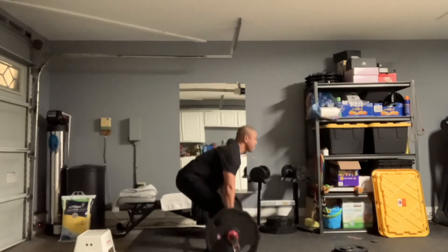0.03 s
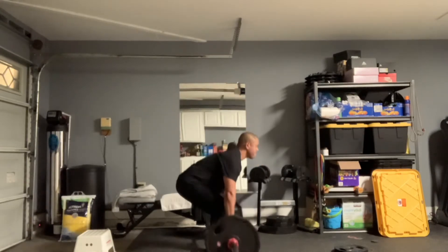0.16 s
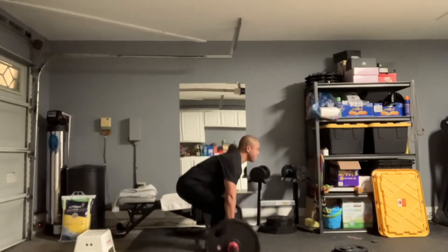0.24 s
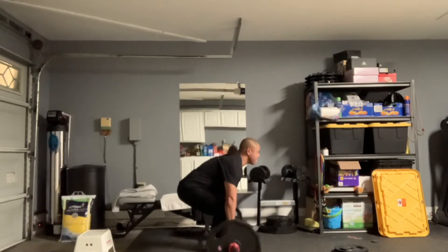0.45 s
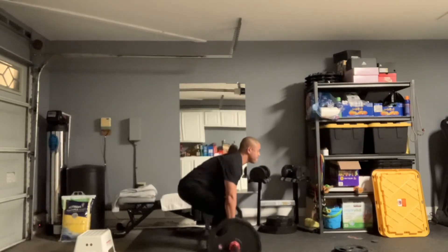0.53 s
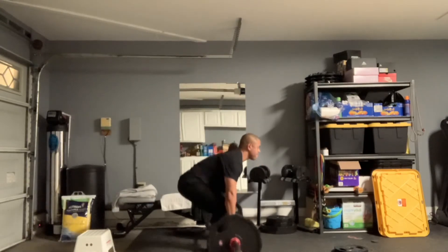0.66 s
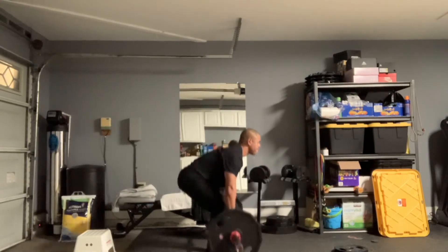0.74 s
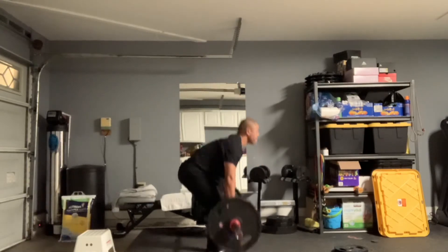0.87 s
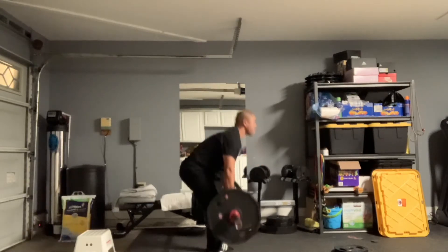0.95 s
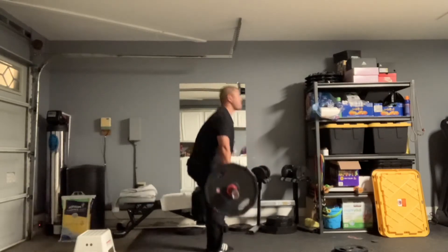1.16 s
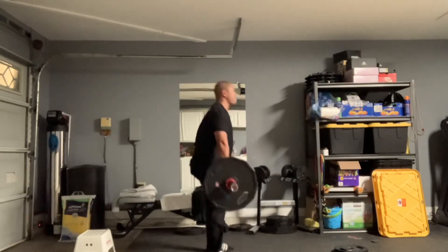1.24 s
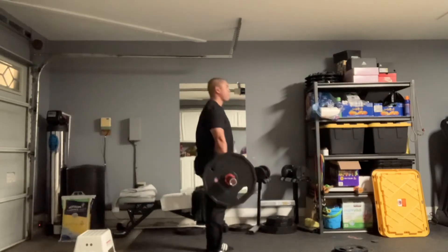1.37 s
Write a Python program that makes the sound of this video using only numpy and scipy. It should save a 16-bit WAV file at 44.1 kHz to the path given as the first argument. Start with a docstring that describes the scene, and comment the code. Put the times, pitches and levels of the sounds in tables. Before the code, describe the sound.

A loaded barbell hits a garage floor: dull bumps at 0.2 seconds, then a loud double clash of plates at 0.23-0.25, with zinging, chattering rebounds fading by 0.5. Steel ringing and room reverberation decay over the following second. Faint soft bumps come near 0.65-0.7, and a small metallic clunk at 1.13 as the bar lifts. Low rumble, mains hum and a faint pulsing cricket-like trill continue throughout.

```python
"""A bare garage, heard from where the reverberation outweighs the direct sound, on two channels.
A loaded barbell lands on the floor: filtered noise bursts make the plates clash and the sleeves zing,
decaying pairs of sines ring the steel bar, and trains of small contacts chatter as it rebounds.
Soft bumps surround the landing; later the bar clunks softly against the plates as it is lifted.
Shaped noise and steady sines give the low rumble and hum, swelling narrow noise a faint high trill."""
import sys
import numpy as np
from scipy import signal
from scipy.fft import rfft, irfft
from scipy.io import wavfile
from scipy.ndimage import uniform_filter1d

SR = 44100
rng = np.random.default_rng(int(sys.argv[2]) if len(sys.argv) > 2 else 0)


def pcm_store(signal):
    """Save signal as 16-bit PCM."""
    levels = np.round(np.clip(np.atleast_2d(signal), -1, 1) * 32767)
    wavfile.write(sys.argv[1], SR, levels.astype(np.int16).T)


N = 61739
T = np.arange(N) / SR  # s
SIZE = 2 ** 16  # samples in a long spectrum
FREQ = np.maximum(np.arange(SIZE // 2 + 1) * SR / SIZE, 1)  # Hz
SHORT = 2 ** 13  # samples in one contact sound
SHORT_T = np.arange(SHORT) / SR  # s
SHORT_HZ = np.maximum(np.arange(SHORT // 2 + 1) * SR / SHORT, 1)


def undb(db):
    """Decibels to gain."""
    return 10 ** (np.asarray(db) / 20)


def curve(points, hz=FREQ):
    """Read (Hz, value) points on a log-frequency axis."""
    f, v = np.array(points, float).T
    return np.interp(np.log(hz), np.log(f), v)


def unit(x):
    """Scale each channel to unit energy."""
    return x / np.sqrt(np.sum(x ** 2, axis=-1, keepdims=True))


def unit_rms(x):
    """Scale each N-sample channel to an RMS of one."""
    return unit(x) * np.sqrt(N)


def fade(t60, t=T):
    """Exponential decay, falling 60 dB in t60 seconds."""
    return np.exp(-np.log(1000) * t / max(t60, 1e-4))


def add(out, x, s):
    """Mix a sound in at its moment."""
    start = min(max(int(s * SR), 0), N)
    count = min(x.shape[-1], N - start)
    out[..., start:start + count] += x[..., :count]


# likeness of the left and right channels in diffuse sound: f/Hz, correlation
LIKENESS = [(60, 0.42), (250, 0.77), (600, 0), (2000, 0.012), (5000, 0.0053), (14000, 0)]


def diffuse():
    """Spectra of left and right noise, sharing most of their sound in the bass."""
    mid, side = rfft(rng.standard_normal((2, SIZE)))
    c = np.clip(curve(LIKENESS), -.95, .95)
    sign = np.array([[1], [-1]])
    return (mid * np.sqrt(1 + c) + sign * side * np.sqrt(1 - c)) / np.sqrt(2)


# colour of the background rumble, relative density: f/Hz, level/dB per Hz
AIR_COLOUR = [(20, -20.5), (35, -5), (55, 3), (80, 4.5), (100, -4.5), (150, -6.5), (200, -20), (350, -19.5),
              (550, -25.5), (1100, -24.5), (2000, -37.5), (4000, -39.5), (8000, -48.5), (14000, -42.5),
              (15500, -40.5)]
AIR_DB = -59.5  # RMS
# steady mains hum: f/Hz, RMS level/dB
HUM = [(59.6, -77.5), (119.3, -62), (360, -88.5)]


def background():
    """Low rumble of shaped noise with a mains hum of steady sines."""
    out = undb(AIR_DB) * unit_rms(irfft(diffuse() * undb(curve(AIR_COLOUR)))[:, :N])
    for hz, db in HUM:
        out = out + undb(db) * np.sqrt(2) * np.sin(2 * np.pi * (hz * T + rng.random()))
    return out


TRILL_HZ, TRILL_WIDTH_HZ, TRILL_REST_DB = 5954, 100, -83  # width is one Gaussian deviation
# swells of the trill above its resting level: middle t/s, length t/s, level/dB
TRILL_SWELLS = [(0.028, 0.24, -71.5), (.22, 0.059, -68), (0.473, .16, -84), (0.705, 0.26, -72.5),
                (0.923, 0.16, -71), (1.158, 0.18, -72), (1.368, 0.15, -72.5)]


def trill():
    """A thin, narrow band of noise that swells and sinks, perhaps a cricket outside."""
    band = np.exp(-.5 * ((FREQ - TRILL_HZ) / TRILL_WIDTH_HZ) ** 2)
    tone = unit_rms(irfft(diffuse() * band)[:, :N])
    level = undb(TRILL_REST_DB)
    for s, length, db in TRILL_SWELLS:
        level = level + undb(db) * np.cos(np.pi * np.clip((T - s) / length, -.5, .5)) ** 2
    return tone * level


def colour(x, db):
    """Pass a short sound through a causal filter with a gain in dB at every frequency."""
    # folding the cepstrum gives the minimum phase
    cepstrum = irfft(np.log(undb(db)))
    cepstrum[1:SHORT // 2] *= 2
    cepstrum[SHORT // 2 + 1:] = 0
    return irfft(rfft(x) * np.exp(rfft(cepstrum)))


def even(x):
    """Flatten the broad spectrum of a random contact, so that only the struck body colours the sound."""
    power = uniform_filter1d(np.abs(rfft(unit(x))) ** 2, 24)
    return unit(colour(x, -10 * np.log10(power + 1e-4)))


def burst(t60):
    """A short crack of dense, quickly damped vibration."""
    return even(rng.standard_normal(SHORT) * fade(t60, SHORT_T))


def knocks(events, spectrum, t60):
    """Light, damped contacts: coloured cracks at (t/s, level/dB)."""
    out = np.zeros(N)
    for s, db in events:
        add(out, undb(db) * colour(burst(t60), curve(spectrum, SHORT_HZ)), s)
    return out


# soft bumps of the rubber plates: t/s, level/dB
BUMPS = [(.201, -7), (.222, -5), (.655, -12.5), (.71, -18)]
# their colour: f/Hz, level/dB per Hz
BUMP_COLOUR = [(100, -20), (300, -14), (600, 0), (900, -4), (1400, -22), (3000, -42), (12000, -60)]


def bumps():
    """Rubber damps each contact to a dull, short thud."""
    return knocks(BUMPS, BUMP_COLOUR, t60=0.025)


# room decay of the garage: f/Hz, t60/s
ROOM_T60 = [(100, 0.52), (400, 0.74), (1100, 0.77), (3000, 0.67), (5500, 0.54), (9000, 0.4), (14000, 0.29)]
GARAGE_DB, DIRECT_DB = 1.5, -6.5  # all of the room response; direct sound against the tail
BUILD_S, EARLY_DB, EARLY_S = 0.0013, -1.5, 0.018  # tail build-up; near reflections and their decay


def garage(x):
    """Direct sound, sparse near reflections and a dense tail whose treble dies first."""
    noise, tail = diffuse(), 0
    for k, (hz, t60) in enumerate(ROOM_T60):
        # overlapping bands, each with its own decay
        share = curve([(f, j == k) for j, (f, _) in enumerate(ROOM_T60)])
        tail = tail + irfft(noise * share)[:, :N] * fade(t60)
    # the fifth power leaves a few strong spikes
    early = unit(rng.standard_normal((2, N)) ** 5 * np.exp(-T / EARLY_S) * (T > .002))
    response = unit(tail * (1 - np.exp(-T / BUILD_S))) + undb(EARLY_DB) * early
    response[:, 0] += undb(DIRECT_DB)
    return undb(GARAGE_DB) * signal.fftconvolve(x[None], response, axes=1)[:, :N]


CHATTER_DB, CLASH_T60_S = -4.5, .02  # small contacts against the first; damping of each crack
RISE_S = 0.0024  # time constant of each clash's build-up


def chatter(length):
    """One contact and a quickly dying train of smaller ones, each with a short crack."""
    train = rng.standard_normal(SHORT) ** 5 * np.exp(-SHORT_T / max(length, 1e-3))
    contacts = undb(CHATTER_DB) * unit(train)
    contacts[0] += 1
    cracks = signal.fftconvolve(contacts, burst(CLASH_T60_S))[:SHORT]
    return even(cracks * (1 - np.exp(-SHORT_T / RISE_S)))


def tilt(db_per_octave):
    """Treble tilt of a blow in dB, pivoting at 2 kHz and level below 1 kHz."""
    return db_per_octave * np.log2(np.maximum(SHORT_HZ, 1000) / 2000)


# blows of the landing: t/s, relative plate clash level/dB, relative bar ring level/dB,
# treble tilt/dB per octave, chatter decay time t/s
BLOWS = [(0.2338, 1, -2, -0.5, 0.0033), (0.2501, -0.5, -3.5, 2, 0.015), (.277, -9, -14, 2.5, 0.0077),
         (.312, -20, -16, 4, .008), (.354, -16, -17.5, 5.5, 0.0047), (.378, -12.5, -16.5, 2, 0.016),
         (.405, -30.5, -23, 7, 0.022), (.429, -22, -26.5, 4.5, 0.0091), (.507, -31, -55, -0.5, 0.0027)]
# colour of the plate clash, relative density: f/Hz, level/dB per Hz
CLASH_COLOUR = [(40, -21), (70, -19), (130, -27), (200, -26.5), (300, -15), (420, -11), (570, -4.5),
                (880, -7.5), (1080, -1), (1500, -4), (1750, -12), (2150, -6), (2550, -8.5), (3100, -5.5),
                (3550, -7.5), (3850, -15.5), (6300, -19), (7500, -32.5), (9500, -20.5), (11000, -31),
                (12200, -48), (13500, -39), (15000, -69)]
CLASH_DB = 19


def clash():
    """Each blow clashes the plates; the rebounds are lighter and mostly brighter."""
    out = np.zeros(N)
    for s, clash_db, _, tilt_db, length in BLOWS:
        gain_db = curve(CLASH_COLOUR, SHORT_HZ) + tilt(tilt_db) + CLASH_DB + clash_db
        add(out, colour(chatter(length), gain_db), s)
    return out


# bright clusters of close modes in the steel sleeves: f/Hz, width f/Hz, relative level/dB
CLUSTERS = [(3030, 120, -1), (5523, 160, -6), (6640, 53, -21.5), (8125, 120, -9.5), (9370, 540, -12.5),
            (10560, 310, -19), (13510, 490, -11.5)]
CLUSTER_DB, CLUSTER_T60_S = -2, 0.14


def sleeves():
    """Each blow makes the sleeves zing: noise through resonance peaks of crowded modes."""
    power = 0
    for hz, width, db in CLUSTERS:
        peak = 2 * SR / (np.pi * width)  # equal energy at any width
        power = power + undb(db) ** 2 * peak / (1 + (2 * (SHORT_HZ - hz) / width) ** 2) ** 2
    peaks_db = 10 * np.log10(power)
    out = np.zeros(N)
    for s, _, ring_db, tilt_db, _ in BLOWS:
        add(out, colour(burst(CLUSTER_T60_S), peaks_db + tilt(tilt_db) + CLUSTER_DB + ring_db), s)
    return out


# modes of bar and plates: f/Hz, relative level/dB, t60/s
MODES = [(1033, -9.5, .45), (1080, 1, 0.6), (1081, -19, 2.2), (1143, -4.5, 0.76), (1176, -7, 0.35),
         (1216, -8.5, .5), (1306, -5, 0.71), (1494, -2, 0.58), (1982, -15, 0.37), (2085, -7, .5),
         (2887, -8, 0.7), (3099, 0.5, .55), (3372, -9, 0.41), (3460, -6.5, 0.4), (3606, -11, .45),
         (4452, -15.5, .4), (4920, -20, .35), (5530, -15, 0.65)]
RING_DB, RING_ROOM_DB = -2.5, -12.5  # ring level; its further send into the room
PAIR_SPLIT = .003  # largest relative detuning of a pair


def ring():
    """Each blow rings the modes for up to 1 s; each is a close pair, one for each end of the bar."""
    out = np.zeros((2, N))
    spread = np.array([[0.44, 0.14], [.4, 1]])  # rows left, right; columns the two of a pair
    t = T[:SR]
    for hz, db, t60 in MODES:
        pair = hz * (1 + PAIR_SPLIT * (2 * rng.random() - 1) * np.arange(2)[:, None])
        angle = (2 * np.pi * pair * t).astype(np.float32)
        sine = unit(spread @ np.sin(angle) * fade(t60, t))
        cosine = unit(spread @ np.cos(angle) * fade(t60, t))
        phases = 2 * np.pi * rng.random(len(BLOWS))
        for (s, _, ring_db, tilt_db, _), phase in zip(BLOWS, phases):
            octaves = np.log2(max(hz, 1000) / 3000)
            gain = undb(RING_DB + db + ring_db + tilt_db * octaves)
            add(out, gain * (np.cos(phase) * sine + np.sin(phase) * cosine), s)
    return out


def low_mode(s, hz, db, t60, rise):
    """One heavy, slowly starting vibration: a decaying sine with a soft onset."""
    out = np.zeros(N)
    add(out, undb(db) * np.sin(2 * np.pi * hz * T) * fade(t60) * (1 - np.exp(-T / rise)), s)
    return out


def floor_thump():
    """The floor under the weight, set moving by the first blow."""
    return low_mode(BLOWS[0][0], hz=60.63, db=-50.5, t60=1.9, rise=0.0084)


def shaft_flex():
    """The low bending mode of the shaft, set off by the rebound."""
    return low_mode(0.339, hz=309, db=-42, t60=0.61, rise=.035)


# clunks of the lift: t/s, level/dB
CLUNKS = [(1.1334, -8), (1.141, -16)]
# their colour: f/Hz, level/dB per Hz
CLUNK_COLOUR = [(100, -25), (350, -13), (600, -14), (1000, -6), (1900, -3.5), (2600, -10), (3300, -9.5),
                (4200, -19.5), (6500, -27.5), (9000, -39.5), (14000, -43)]


def clunks():
    """The bar meets the plates softly as it is lifted: very short, damped cracks."""
    return knocks(CLUNKS, CLUNK_COLOUR, t60=0.0087)


# stereo balance, left minus right: f/Hz, level/dB
BALANCE_DB = [(60, -1), (130, -7), (400, -0.5), (1200, 0.3), (2200, 2.3), (4500, -1.5), (8500, -3.5),
              (13500, -.5)]


def scene():
    """The barbell in its garage over the background, balanced between left and right."""
    tones = ring()
    contacts = bumps() + clash() + sleeves() + clunks()
    in_room = garage(contacts + undb(RING_ROOM_DB) * tones[0])
    sound = background() + trill() + in_room + tones + floor_thump() + shaft_flex()
    half = np.array([[.5], [-.5]])  # each side takes half of the difference
    return irfft(rfft(sound, SIZE) * undb(half * curve(BALANCE_DB)))[:, :N]


def record(dry):
    """A steep low-pass at 15.6 kHz ends the treble."""
    return signal.sosfilt(signal.ellip(8, .2, 70, 15600, fs=SR, output="sos"), dry)


dry = scene()
out = record(dry)
pcm_store(out)
```